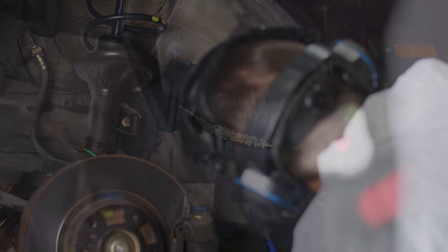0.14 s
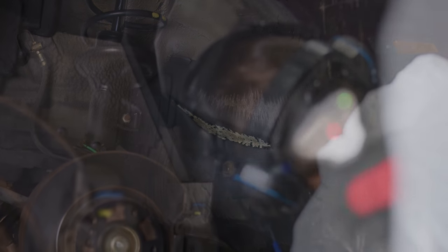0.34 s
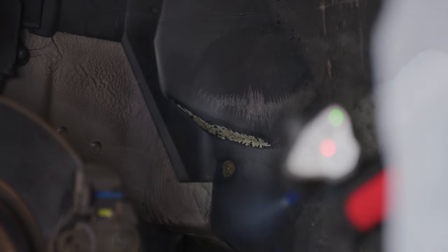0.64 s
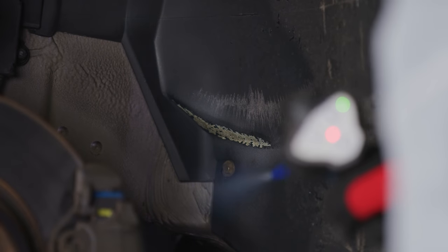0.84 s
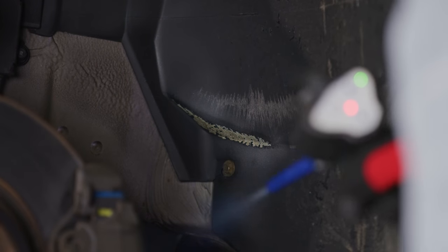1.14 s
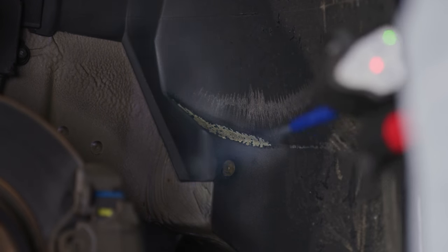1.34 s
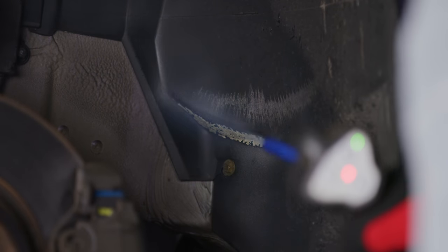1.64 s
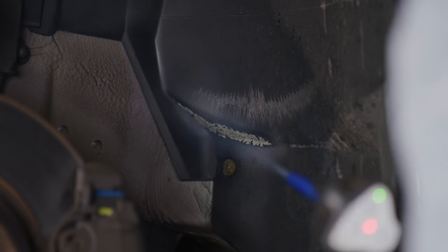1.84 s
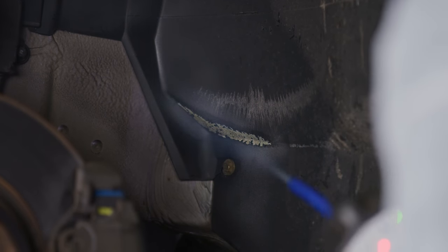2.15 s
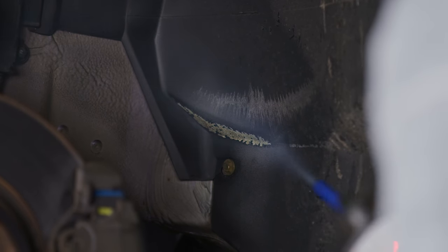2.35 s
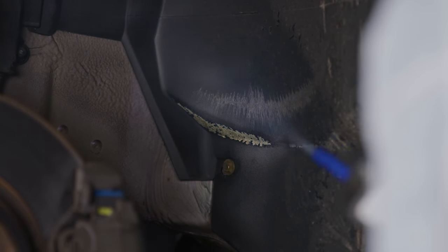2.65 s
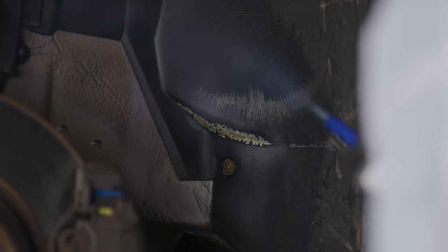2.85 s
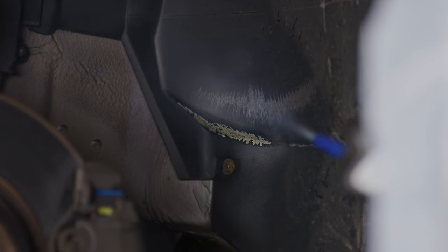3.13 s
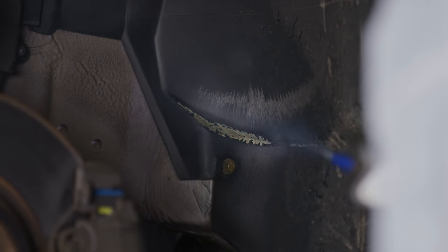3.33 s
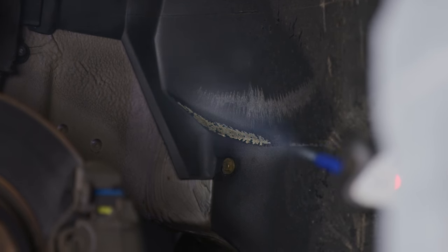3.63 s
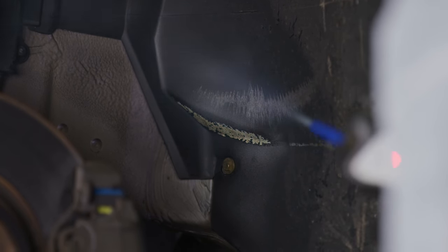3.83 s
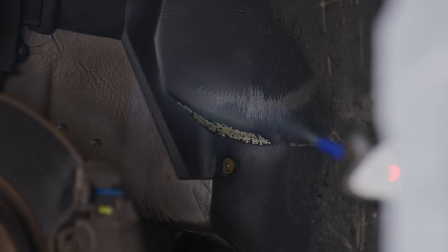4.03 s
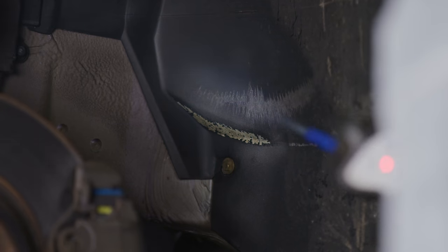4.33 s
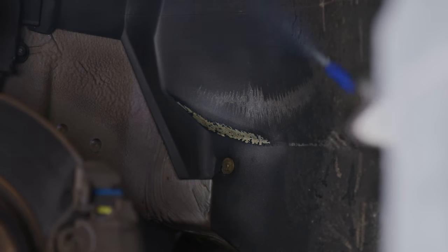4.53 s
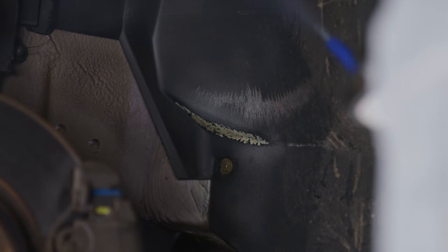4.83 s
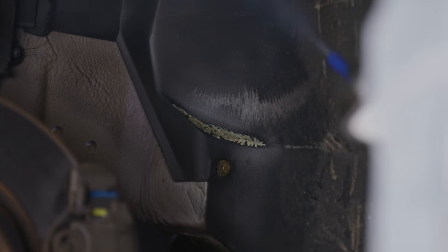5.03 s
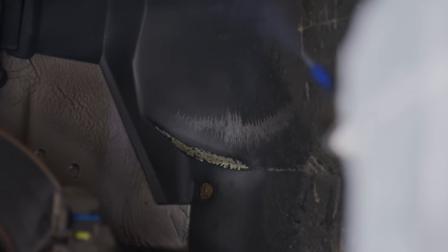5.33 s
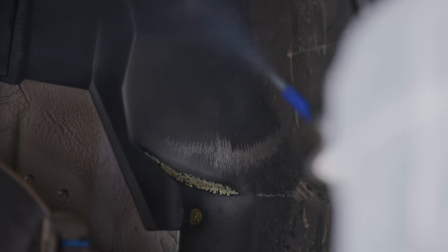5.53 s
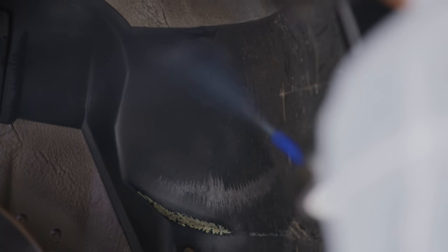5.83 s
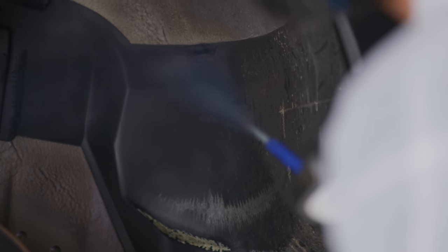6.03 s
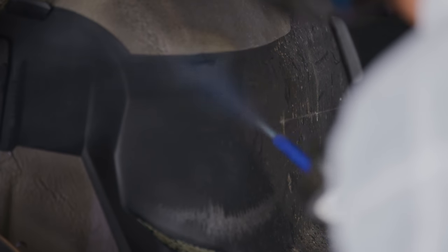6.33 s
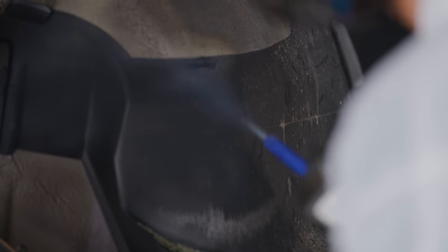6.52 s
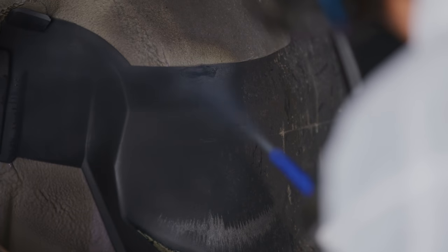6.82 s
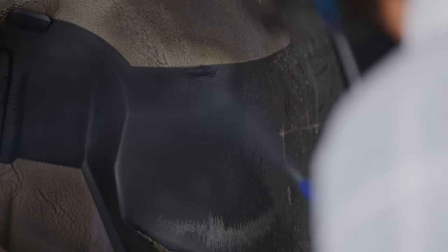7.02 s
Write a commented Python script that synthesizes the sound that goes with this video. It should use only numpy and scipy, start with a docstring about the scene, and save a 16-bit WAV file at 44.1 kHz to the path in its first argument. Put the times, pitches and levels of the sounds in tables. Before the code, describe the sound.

A close, steady, very bright hiss of a dry ice blasting jet scrubs a car's wheel well, swelling softly with quick hand strokes.

```python
'''In a garage, a dry ice blasting gun scrubs the wheel well of a car at close range, a few hand strokes a second.
The jet is noise in a broad hiss and two shock bands plus a gliding screech; pellets tick in it and their feed shakes it.
Strokes swell the sound in three ways: splash on the panel with more hiss and a sagging screech,
narrow noise in the hollow well, or a gust of roar, buffeting and hoot.
Echoes comb the hiss, their strengths shifting as the gun travels. Wavering sines make the machine hum.'''
import sys
import numpy as np
from scipy import signal
from scipy.fft import rfft, irfft
from scipy.io import wavfile

SR = 44100
rng = np.random.default_rng(int(sys.argv[2]) if len(sys.argv) > 2 else 0)


def store_wav(level_fs):
    """Save 16-bit WAV to argv[1]."""
    pcm = np.round(np.clip(np.atleast_2d(level_fs), -1, 1) * 32767)
    wavfile.write(sys.argv[1], SR, pcm.T.astype(np.int16))


N = 316197
TIME_S = np.arange(N) / SR
FREQS_HZ = np.maximum(np.fft.rfftfreq(N, 1 / SR), 1)

# Machine hum. Each row: frequency in Hz, typical rms level in dB.
HUM_TONES = [(56, -66), (134.5, -62.5), (299, -62.5), (608, -63.5)]

# Deflected air, before gusts. Each row: time in seconds, roar in dB, buffeting in dB.
WASH_LEVELS = [(0.0, -42, -47.8), (0.6, -46.5, -50), (1.3, -42.5, -48.5), (2.0, -45.5, -49),
               (4.0, -44.1, -47.5), (5.4, -42.3, -51), (6.2, -39.5, -47.5), (7.2, -43.5, -53)]
# Air modes of the well. Each row: centre in Hz, width in Hz, relative level in dB.
WELL_AIR_MODES = [(828.5, 120, -5.5), (1009.7, 122, 2), (1146, 130, -1.5)]
# Spectra of roar and buffeting. Each row: frequency in Hz, relative density in dB per Hz.
ROAR_SPECTRUM = [(140, -26), (240, -10.5), (264, -6.5), (296, -3.5), (371, -2.5), (451, 2), (575, -3.5),
                 (721, -5), (838, -3), (900, -6), (1170, -51), (1980, -120)]
BUFFET_SPECTRUM = [(25, -20), (45, -14), (80, -10.5), (110, -7.5), (135, 0.5), (158, -1.5), (175, -1.5),
                   (225, 0), (260, -11), (400, -13.5)]
# Strokes across the mouth of the hollow. Each row: time in seconds, lift of the ring in dB.
HOLLOW_LIFTS = [(0.14, 2), (1.9, 8), (2.61, 4.1), (2.82, 6.0), (3.14, 4), (4.19, 3.5), (4.58, 4.5),
                (4.93, 4.5), (6.02, 4), (6.27, 4), (6.6, 3.3)]
# Strokes into a narrow corner. Each row: time in seconds, lift of the roar in dB.
CORNER_LIFTS = [(0.91, 6), (1.15, 4.5), (1.39, 3), (3.96, 0), (4.3, 0.5), (6.26, 2.5), (6.52, 2),
                (6.83, 1.5)]

# Impact levels as the gun travels, before strokes.
# Each row: time in seconds, panel splash in dB, ring of the well in dB.
IMPACT_LEVELS = [(0.0, -33, -38.5), (0.4, -36, -47), (0.8, -34, -45), (1.5, -31, -45), (2.4, -33.5, -43.5),
                 (4.1, -32, -42.7), (4.6, -35, -40.5), (5.9, -36.5, -41), (7.2, -36, -41.9)]
# Splash spectrum. Each row: frequency in Hz, relative density in dB per Hz.
SPLASH_SPECTRUM = [(1500, -10), (2000, -14), (2800, -20), (3500, -8), (4100, -5), (5000, -3), (5700, 1),
                   (6400, -5), (7500, -27), (10000, -28)]
# Panel resonances. Each row: centre in Hz, width in Hz, peak lift in dB.
PANEL_PEAKS = [(4150, 170, 1.4), (4490, 130, 2.6)]
# Strokes squarely across the panel. Each row: time in seconds, lift of the splash in dB.
PANEL_LIFTS = [(0.31, 2), (0.74, 2), (1.64, 0.5), (1.88, 3), (2.18, 3.5), (2.41, 1.5), (2.67, 2.8),
               (2.95, 2.5), (3.54, 2), (3.89, 1), (4.6, 1.5), (4.95, 2.5), (5.16, 1.5), (5.43, 1.5),
               (5.75, 2.5), (6.02, 1.8), (6.55, 4.5), (6.87, 3)]

# Jet levels as the gun travels, before strokes and beam swings.
# Each row: time in seconds, broad hiss in dB, main shock band in dB, upper shock band in dB.
JET_LEVELS = [(0.0, -31.5, -24, -34.8), (0.5, -30, -26, -32.8), (0.7, -28, -23.5, -31.3),
              (1.2, -29, -24.5, -30.4), (2.0, -30.0, -22.8, -32), (2.4, -30.5, -24.1, -30.7),
              (3.2, -30.0, -23.5, -32), (4.2, -30, -23.5, -31), (4.7, -28.5, -22.5, -33.4),
              (5.3, -29.5, -23.5, -33), (6.5, -28.5, -23, -30.5), (7.2, -29.5, -23, -34)]
# Jet spectra. Each row: frequency in Hz, relative density in dB per Hz.
HISS_SPECTRUM = [(600, -17), (1500, -10.5), (2100, -8.5), (2800, -13), (3500, -13), (5000, -7), (7000, 3),
                 (8200, -0.5), (9500, -0.5), (13000, -7), (14400, -9), (16000, -12)]
SHOCK_SPECTRUM = [(7500, -22.5), (9000, -6.5), (10000, -0.5), (11200, 2.5), (12600, 0.5), (13500, 2.5),
                  (14300, -13), (16000, -22)]
UPPER_SHOCK_SPECTRUM = [(13500, -25), (14450, -13), (14900, 12), (15600, 7), (16200, -4)]
# Main band's beam, up towards the microphone, down away from it. Each row: time in seconds, lift in dB.
MAIN_BEAM_LIFTS = [(0.96, 2), (1.11, 2.5), (1.59, 2.8), (1.88, 1), (2.11, 1.8), (2.31, -2), (2.49, -1.5),
                   (2.8, 2), (3.32, 3), (3.72, 1.8), (5.14, 1.2), (5.35, -1.2), (5.75, 1.6)]
# Upper band's beam. Each row: time in seconds, lift in dB.
UPPER_BEAM_LIFTS = [(0.94, 2.8), (2.43, 2.6), (2.81, 2.1), (3.14, 6.0), (3.51, 5.1), (3.85, 5), (4.32, 3.9)]

# Echo across the well. Each row: time in seconds, echo gain as a ratio.
WELL_ECHO_GAINS = [(0, 0.084), (.8, 0.15), (1.3, 0.11), (2.1, 0.15), (2.4, 0.23), (4.3, 0.12), (4.6, 0.084),
                   (5.5, 0.085), (7.17, 0.075)]

# half lengths of the bell-shaped swells
PANEL_HALF_S, HOLLOW_HALF_S, CORNER_HALF_S, BEAM_HALF_S = 0.07, 0.068, 0.067, 0.045
HISS_DB_PER_STROKE_DB = 0.23
BUFFET_DB_PER_GUST_DB = 1.16
HOOT_REST_DB, HOOT_DB_PER_GUST_DB = -53.5, 1.9
SCREECH_HZ, SCREECH_SAG_HZ_PER_DB, SCREECH_WANDER_HZ = 11340, 70, 70
WELL_DELAY_MS, GLINT_RATE_HZ, GLINTS_PER_MS = 1.958, 3.2, 7
CUTOFF_HZ = 15780


def from_db(db):
    """Decibels to amplitude gain."""
    return 10 ** (np.asarray(db) / 20)


def rms_one(x):
    """Scale to unit power."""
    return x / np.sqrt(np.mean(x ** 2) + 1e-20)


def in_time(rows):
    """Interpolate each column of a time table at every sample."""
    row_s, *columns = np.transpose(rows)
    return [np.interp(TIME_S, row_s, column) for column in columns]


def swells(strokes, half_s):
    """Sum of bell-shaped lifts in dB, one per row."""
    return sum(db * np.exp(-((TIME_S - s) / half_s) ** 2) for s, db in strokes)


def drift(rate_hz):
    """Smooth random change, mostly near rate_hz; rms 1."""
    count = N // 16  # computed at SR / 16
    ratio = np.fft.rfftfreq(count, 16 / SR) / rate_hz
    band = ratio / (1 + ratio ** 4)
    slow = rms_one(irfft(rfft(rng.standard_normal(count)) * band))
    return np.interp(np.arange(N) / 16, np.arange(len(slow)), slow)


def colour(x, spectrum, peaks=()):
    """Filter by a broad spectrum with resonant peaks on top; rms 1."""
    hz, db = np.transpose(spectrum)
    shape_db = np.interp(np.log(FREQS_HZ), np.log(hz), db)
    for centre_hz, width_hz, lift_db in peaks:
        shape_db = shape_db + lift_db / (1 + (2 * (FREQS_HZ - centre_hz) / width_hz) ** 2)
    # 12 dB per octave beyond both ends of the table
    outside = np.minimum(FREQS_HZ / hz[0], 1) * np.minimum(hz[-1] / FREQS_HZ, 1)
    return rms_one(irfft(rfft(x) * from_db(shape_db) * outside ** 2, N))


def turbulence(flutter_db, rate_hz):
    """White noise whose strength flutters with the eddies; rms 1."""
    noise = rng.standard_normal(N)
    return rms_one(noise * from_db(flutter_db * drift(rate_hz)))


def pellets(per_s, spread_db):
    """One-sample ticks at random moments, random in sign, sizes spread in dB; rms 1."""
    sizes = from_db(spread_db * np.minimum(rng.exponential(1, N), 4))
    hits = rng.random(N) < per_s / SR
    return rms_one(hits * sizes * rng.choice([-1, 1], N))


def narrow_noise(centre_hz, width_hz):
    """Noise in one resonance: slow noise on a carrier whose centre may move; rms 1."""
    spread = 1 / (1 + (FREQS_HZ / (0.75 * width_hz)) ** 2)
    cosine, sine = irfft(rfft(rng.standard_normal((2, N))) * spread, N)
    phase = 2 * np.pi * np.cumsum(centre_hz + np.zeros(N)) / SR
    return rms_one(cosine * np.cos(phase) + sine * np.sin(phase))


def delayed(x, delay_ms):
    """Delay by phase rotation, so fractions of a sample are kept."""
    return irfft(rfft(x) * np.exp(-2j * np.pi * FREQS_HZ * delay_ms / 1000), N)


def machine(waver_hz, swell_db):
    """Machinery hum: sines wavering independently in pitch and strength."""
    hum = 0
    for hz, db in HUM_TONES:
        phase = 2 * np.pi * np.cumsum(hz + waver_hz * drift(rate_hz=6.4)) / SR
        level_db = db + swell_db * drift(rate_hz=3.2)
        hum = hum + from_db(level_db) * np.sqrt(2) * np.sin(phase)
    return hum


def wheel_well(ring_db, gust_db):
    """The deflected jet blows across the hollow: air modes ring, a corner hoots, air roars and buffets."""
    roar_db, buffet_db = in_time(WASH_LEVELS)
    roar_db = roar_db + gust_db
    buffet_db = buffet_db + BUFFET_DB_PER_GUST_DB * gust_db
    hoot_db = HOOT_REST_DB + HOOT_DB_PER_GUST_DB * gust_db
    modes = [from_db(db) * narrow_noise(hz, width_hz) for hz, width_hz, db in WELL_AIR_MODES]
    ring = from_db(ring_db) * rms_one(sum(modes))
    hoot = from_db(hoot_db) * narrow_noise(centre_hz=1623, width_hz=160)
    roar = from_db(roar_db) * colour(turbulence(flutter_db=1.2, rate_hz=10.6), ROAR_SPECTRUM)
    buffet = from_db(buffet_db) * colour(turbulence(flutter_db=1.0, rate_hz=7), BUFFET_SPECTRUM)
    return ring + hoot + roar + buffet


def splash(splash_db):
    """Air and shattering pellets spread over the panel and excite its resonances."""
    air = turbulence(flutter_db=0.57, rate_hz=17)
    ticks = pellets(per_s=900, spread_db=0.5)
    return from_db(splash_db) * colour(air + from_db(-11.0) * ticks, SPLASH_SPECTRUM, PANEL_PEAKS)


def jet(stroke_db):
    """Supersonic jet: mixing hiss, two shock-cell bands and a screech, with pellets and uneven feed."""
    hiss_db, shock_db, upper_db = in_time(JET_LEVELS)
    hiss_db = hiss_db + HISS_DB_PER_STROKE_DB * stroke_db
    shock_db = shock_db + swells(MAIN_BEAM_LIFTS, BEAM_HALF_S)
    upper_db = upper_db + swells(UPPER_BEAM_LIFTS, BEAM_HALF_S)
    ticks = pellets(per_s=1800, spread_db=0.0)

    mixing = turbulence(flutter_db=0.65, rate_hz=57) + from_db(-12.5) * ticks
    hiss = from_db(hiss_db) * colour(mixing, HISS_SPECTRUM)

    # pitch sags on each panel stroke and wanders with the gap to the panel
    screech_hz = SCREECH_HZ - SCREECH_SAG_HZ_PER_DB * stroke_db + SCREECH_WANDER_HZ * drift(rate_hz=2.5)
    screech = narrow_noise(screech_hz, width_hz=410)
    cells = colour(turbulence(flutter_db=1.13, rate_hz=124) + from_db(-13) * ticks, SHOCK_SPECTRUM)
    shock = from_db(shock_db) * rms_one(cells + from_db(-11.5) * screech)

    upper = from_db(upper_db) * colour(turbulence(flutter_db=1.1, rate_hz=16), UPPER_SHOCK_SPECTRUM)
    feed_db = 0.4 * drift(rate_hz=13.4)
    return (hiss + shock + upper) * from_db(feed_db)


def reflections(x, glint_gain, fade_ms, dull_hz, count):
    """One firm echo across the well combs the hiss; many short ones off curved parts come and go."""
    echo_gain, = in_time(WELL_ECHO_GAINS)
    dull = signal.sosfilt(signal.butter(1, dull_hz, fs=SR, output="sos"), x)
    out = x + echo_gain * delayed(dull, WELL_DELAY_MS)
    # small parts reflect only short waves
    bright = signal.sosfilt(signal.butter(1, 3000, "high", fs=SR, output="sos"), x)
    for k in range(1, count + 1):
        lag_ms = (k + rng.random()) / GLINTS_PER_MS
        echo = np.roll(bright, int(lag_ms * SR / 1000))
        gain = glint_gain * np.exp(-lag_ms / fade_ms) * drift(GLINT_RATE_HZ)  # sign changes too
        out = out + gain * echo
    return out * np.std(x) / np.std(out)  # overall level kept


def scene():
    """One microphone close to the gun feeds both channels."""
    splash_db, ring_db = in_time(IMPACT_LEVELS)
    stroke_db = swells(PANEL_LIFTS, PANEL_HALF_S)
    ring_db = ring_db + swells(HOLLOW_LIFTS, HOLLOW_HALF_S)
    gust_db = swells(CORNER_LIFTS, CORNER_HALF_S)

    hum = machine(waver_hz=0.59, swell_db=1.5)
    hollow = wheel_well(ring_db, gust_db)
    spray = jet(stroke_db) + splash(splash_db + stroke_db)
    spray = reflections(spray, glint_gain=0.11, fade_ms=14.0, dull_hz=14100, count=34)
    return np.tile(spray + hollow + hum, (2, 1))


def record(dry):
    """Steep low-pass, 3 dB down at CUTOFF_HZ."""
    return irfft(rfft(dry) / np.sqrt(1 + (FREQS_HZ / CUTOFF_HZ) ** 400), N)


dry = scene()
out = record(dry)
store_wav(out)
```